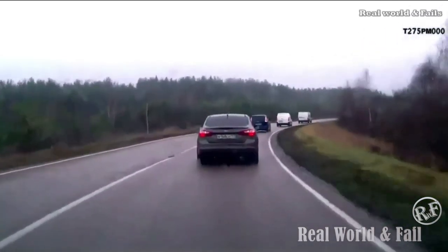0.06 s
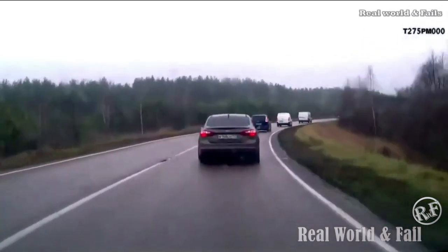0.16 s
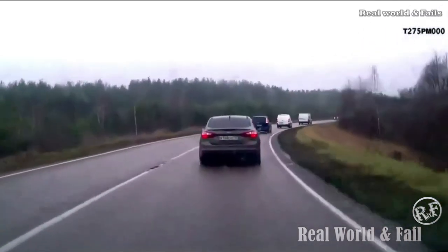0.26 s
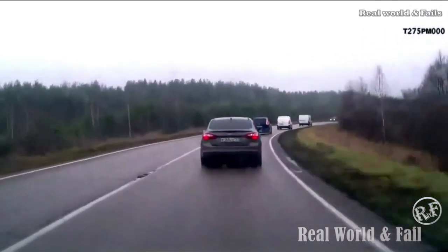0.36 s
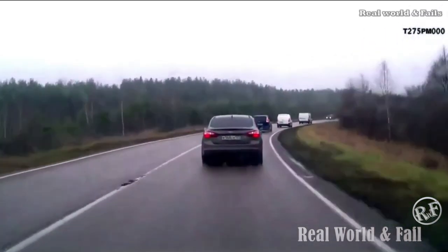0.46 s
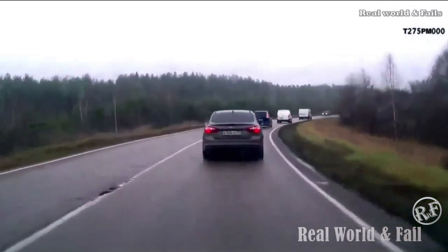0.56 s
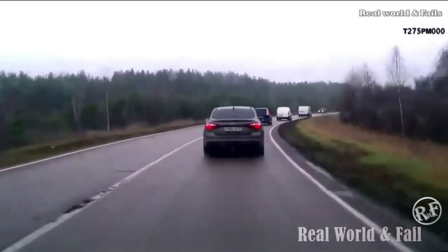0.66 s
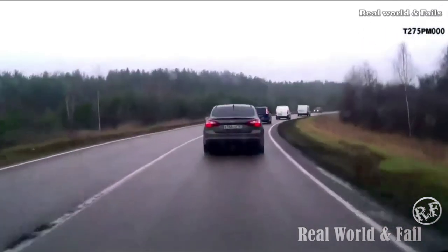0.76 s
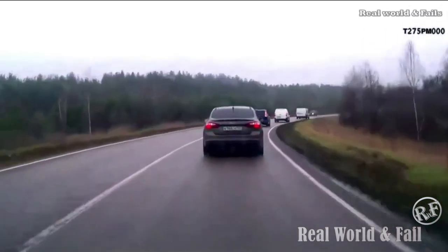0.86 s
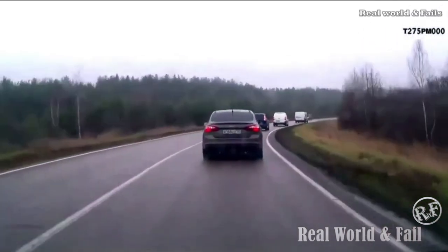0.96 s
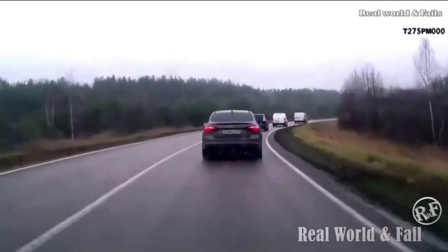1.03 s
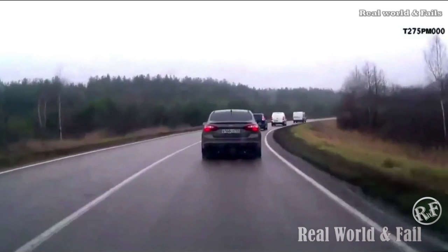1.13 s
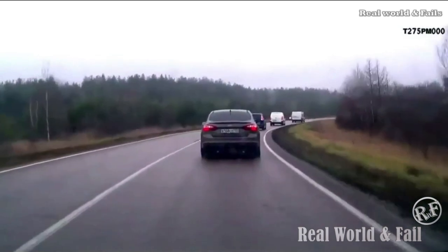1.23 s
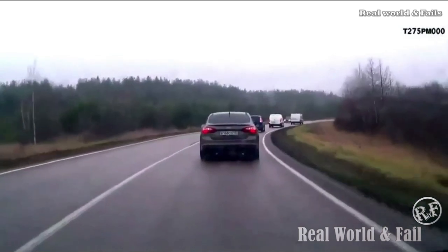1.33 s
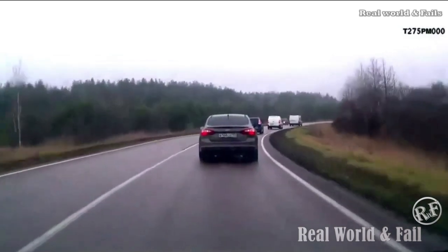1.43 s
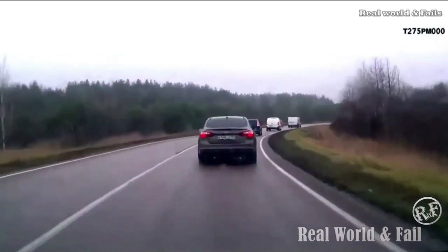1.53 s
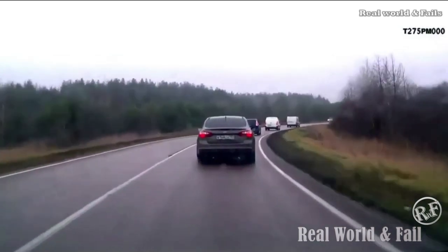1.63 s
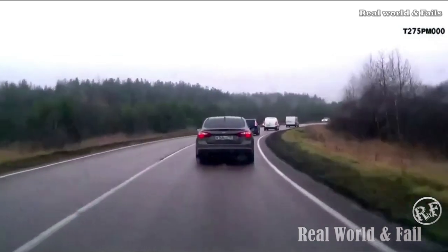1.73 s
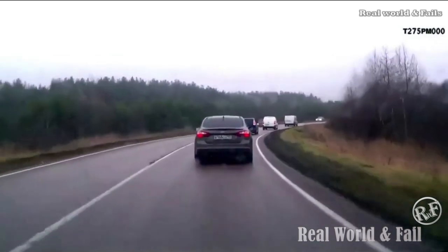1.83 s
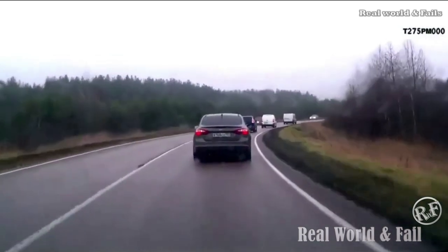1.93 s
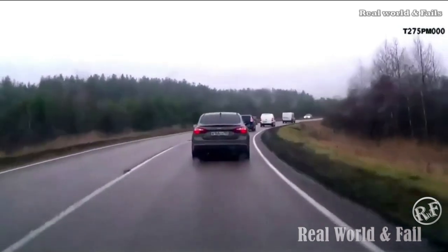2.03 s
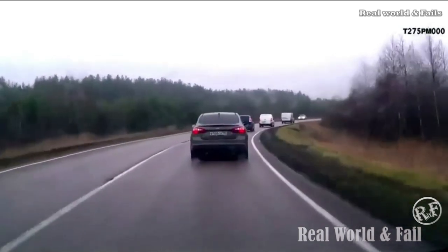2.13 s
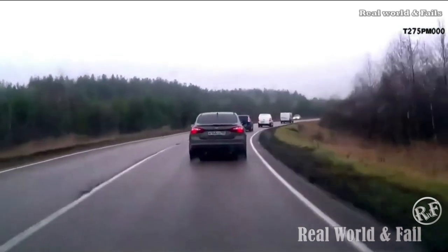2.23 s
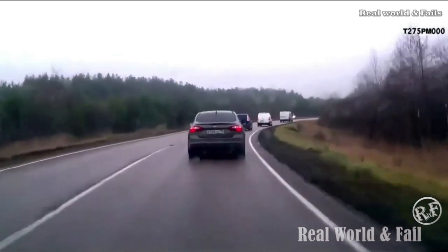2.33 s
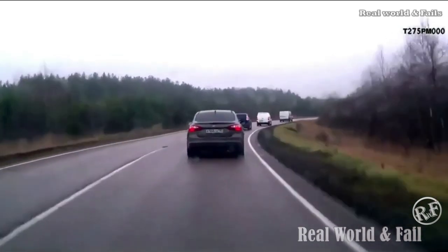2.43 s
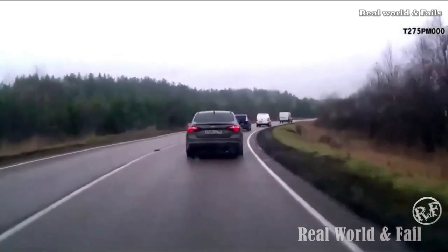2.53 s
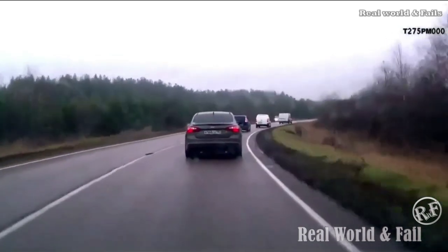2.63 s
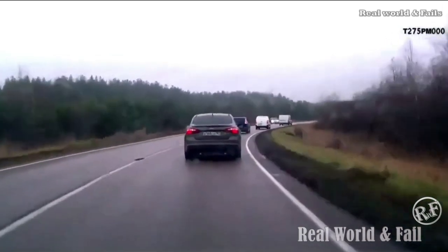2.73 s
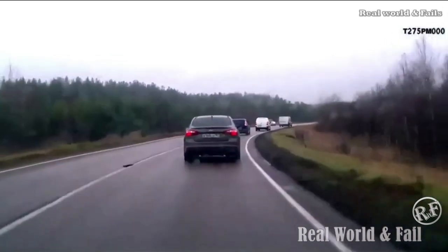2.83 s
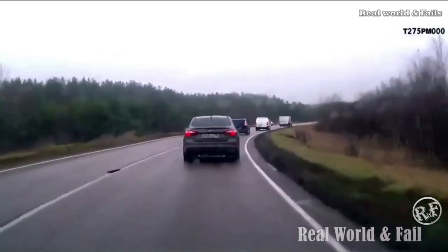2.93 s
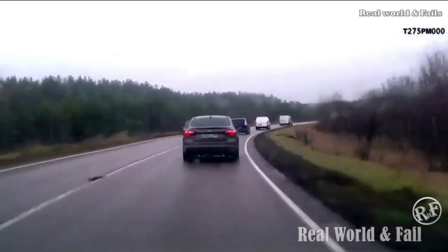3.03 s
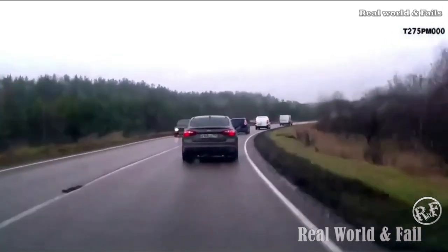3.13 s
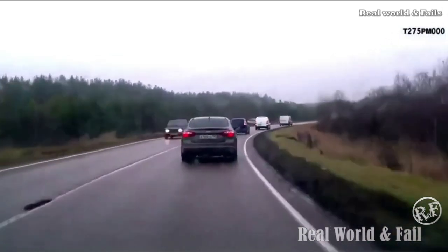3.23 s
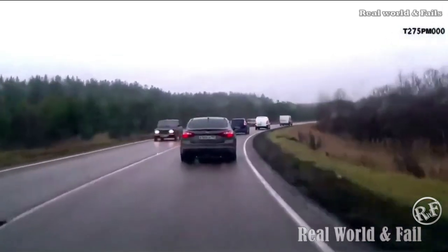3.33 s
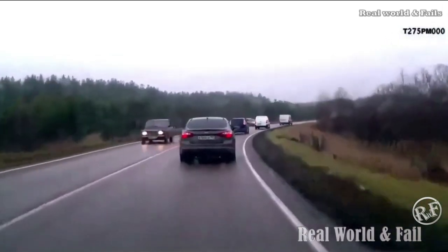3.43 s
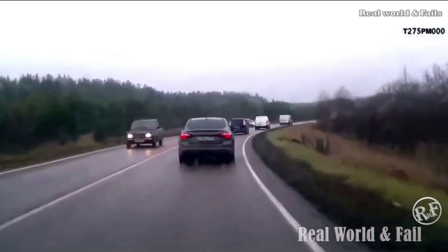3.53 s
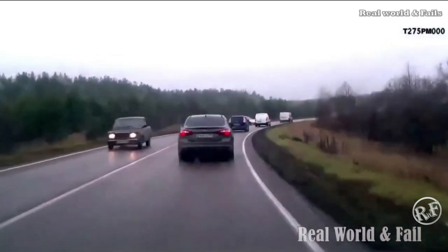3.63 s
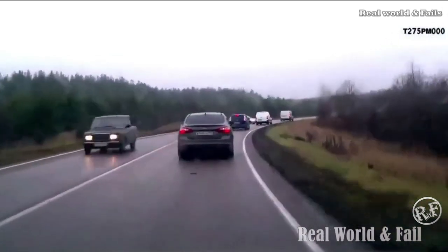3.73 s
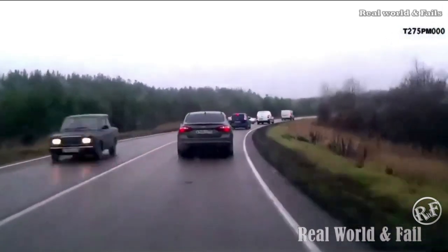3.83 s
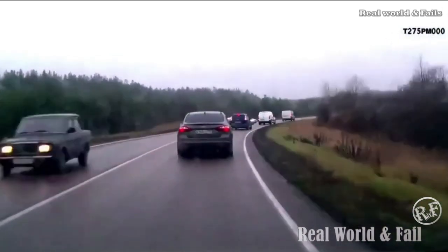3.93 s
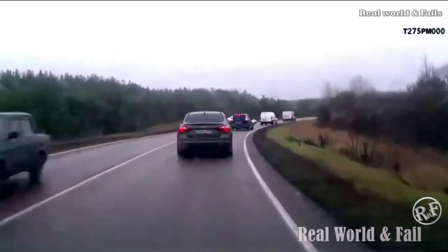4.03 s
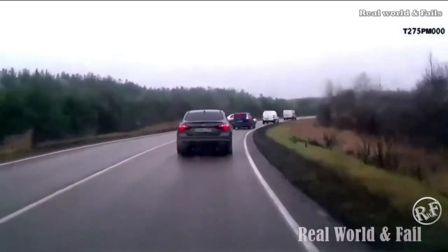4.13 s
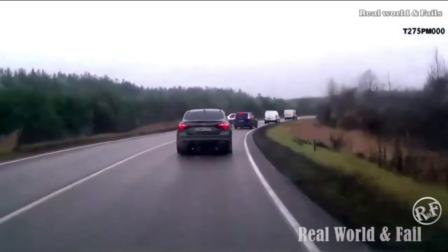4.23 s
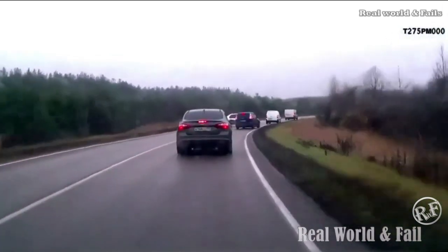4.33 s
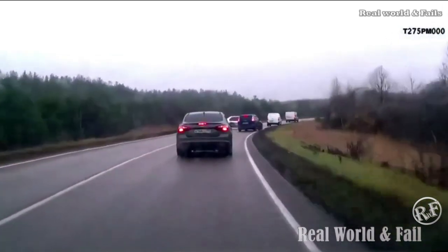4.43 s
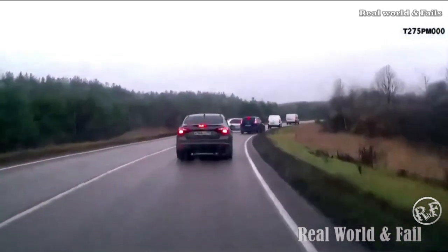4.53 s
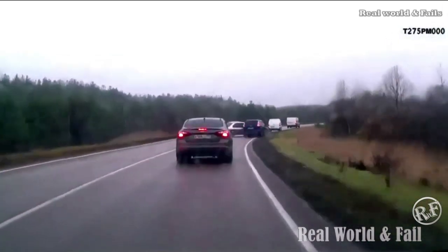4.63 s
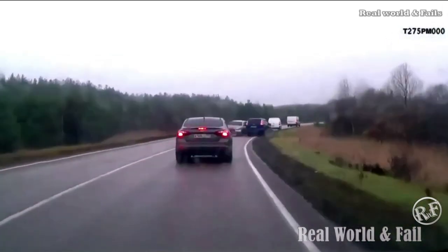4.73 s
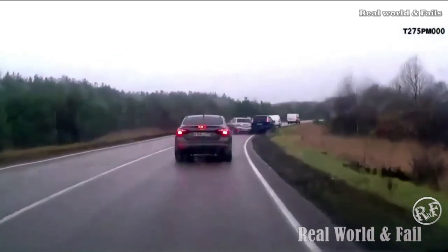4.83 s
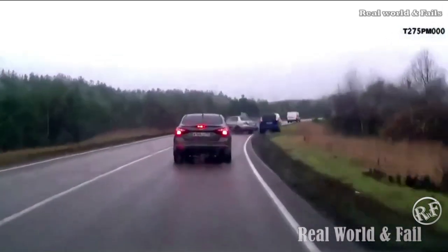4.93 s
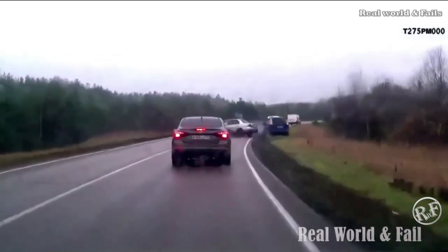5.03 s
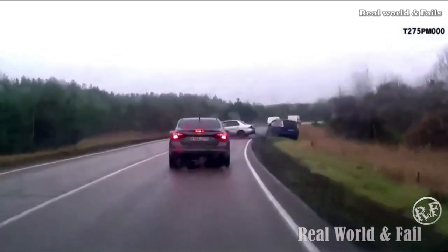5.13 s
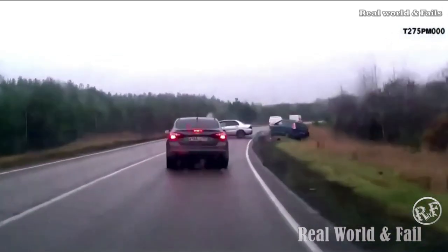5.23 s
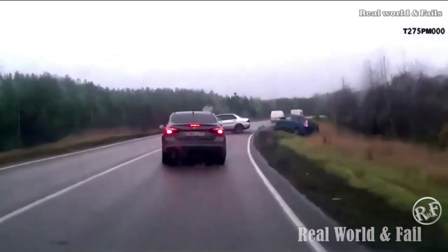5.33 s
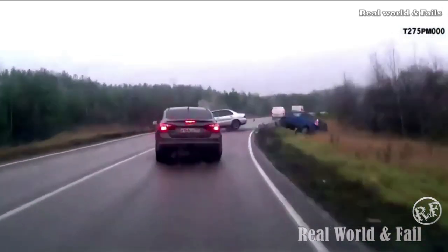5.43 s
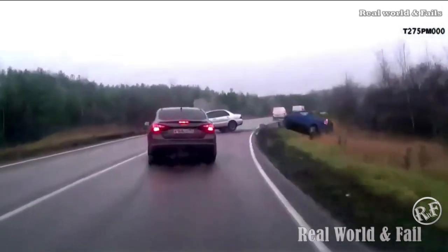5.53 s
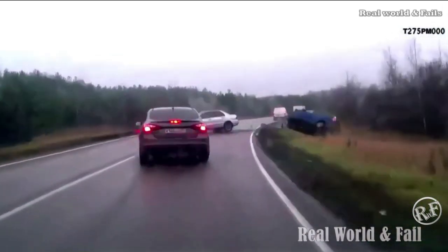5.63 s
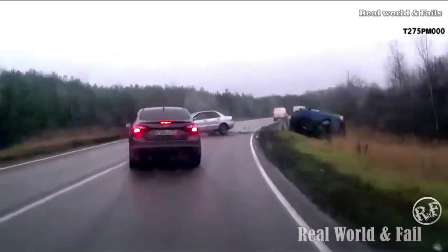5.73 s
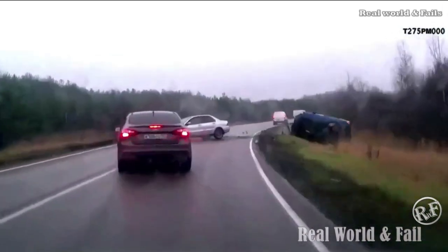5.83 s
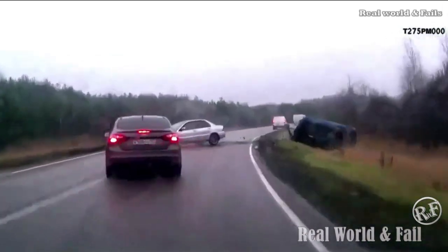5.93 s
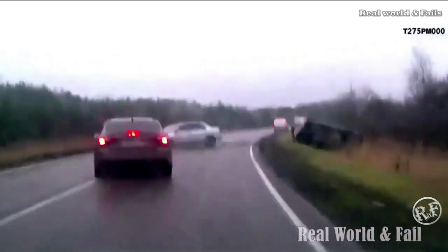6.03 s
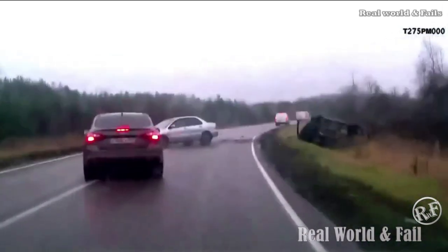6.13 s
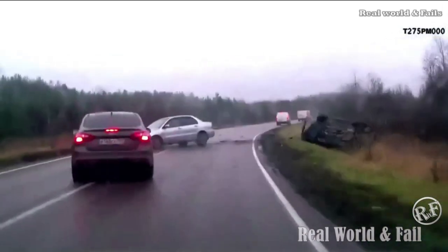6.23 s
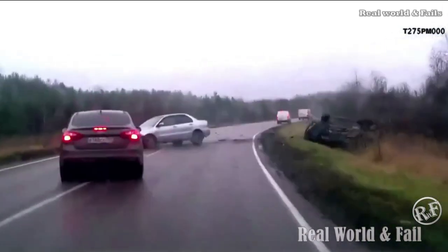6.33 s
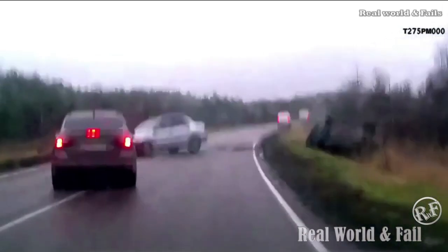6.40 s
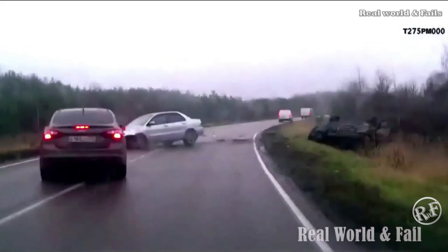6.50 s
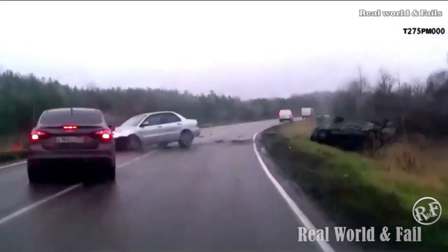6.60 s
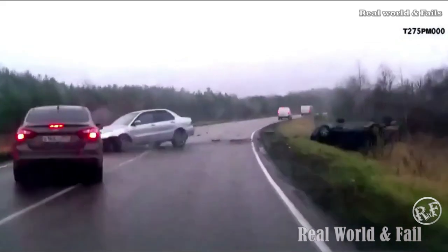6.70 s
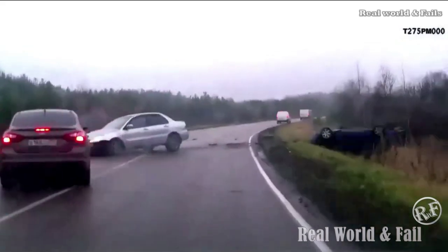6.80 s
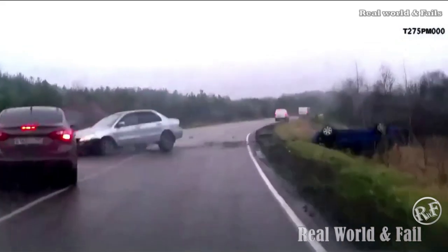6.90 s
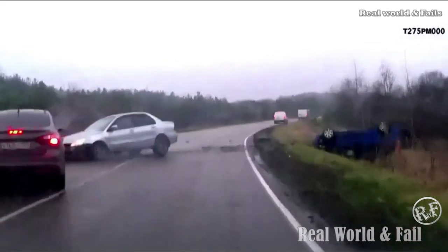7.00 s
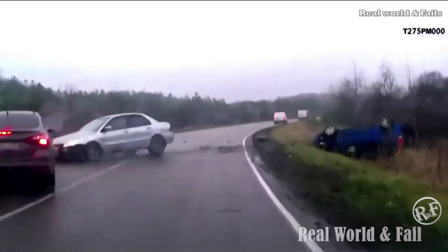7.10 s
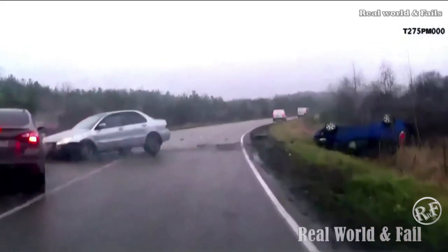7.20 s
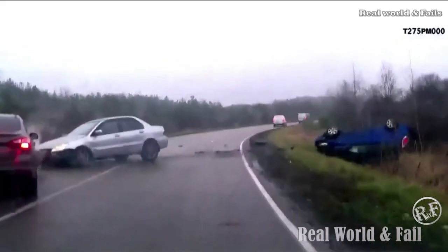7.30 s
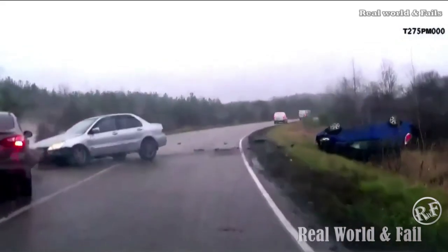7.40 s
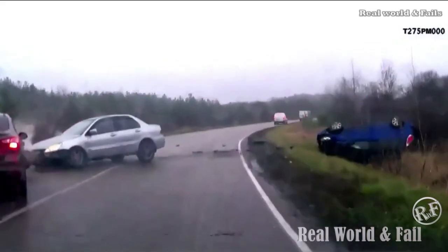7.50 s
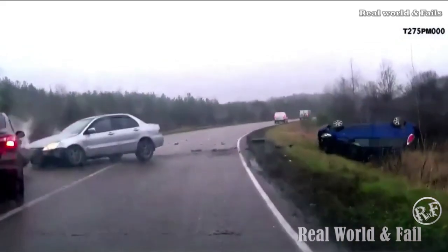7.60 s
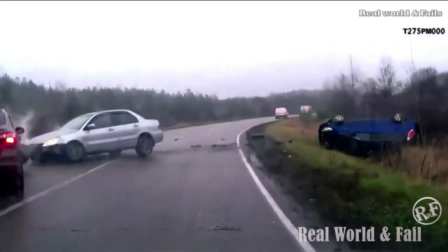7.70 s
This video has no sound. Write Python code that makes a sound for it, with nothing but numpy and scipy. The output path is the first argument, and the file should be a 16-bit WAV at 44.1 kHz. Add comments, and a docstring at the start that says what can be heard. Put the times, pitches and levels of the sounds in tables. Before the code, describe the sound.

Boomy cabin drone with a brief motor whine, suddenly broken by crunching car impacts, spraying glass and clanking wreckage before the noise sinks.

```python
"""Inside a car on a wet road: tyre and engine drone booms in the cabin, a small motor whines, the trim ticks.
Then cars collide ahead: sheet metal crumples, glass and debris scatter, a body thuds and rolls, parts bang down.
The cabin is resonant noise and wandering tones; the crash is noisy contacts ringing banks of resonances.
The loudest blows overload; at the end the sound sinks."""
import sys
import numpy as np
from scipy import signal
from scipy.io import wavfile

SR = 44100
rng = np.random.default_rng(int(sys.argv[2]) if len(sys.argv) > 2 else 0)


def pcm_store(signal):
    """Save signal as 16-bit PCM."""
    levels = np.round(np.clip(np.atleast_2d(signal), -1, 1) * 32767)
    wavfile.write(sys.argv[1], SR, levels.astype(np.int16).T)


N = 342216


def from_db(db):
    """Decibels to gain."""
    return 10 ** (np.asarray(db) / 20)


def rms_one(x):
    """Scale to unit rms."""
    return x / np.sqrt(np.mean(x ** 2) + 1e-20)


def in_time(rows):
    """Value columns of a breakpoint curve, interpolated sample by sample."""
    s, *columns = np.transpose(rows)
    return [np.interp(np.arange(N) / SR, s, column) for column in columns]


def at_hz(points, hz):
    """Read a spectrum on a log-frequency axis."""
    points = np.array(points, float)
    return np.interp(np.log(hz), np.log(points[:, 0]), points[:, 1])


def sides(pan_db):
    """Left and right gains for a left-minus-right level difference."""
    return from_db(np.array([[.5], [-.5]]) * pan_db)


def drift(rate_hz):
    """Slow chance of rms 1: noise through two equal low-passes, computed every 40 samples."""
    step = 40
    r = np.exp(-2 * np.pi * rate_hz * step / SR)
    noise = rng.standard_normal(N // step + 2002)
    slow = signal.lfilter([1], [1, -2 * r, r * r], noise)[2000:]  # settled part only
    return np.interp(np.arange(N) / step, np.arange(len(slow)), rms_one(slow))


def steep(x, stop_hz, kind):
    """Sharp low- or high-pass, 50 dB down at the stop edge."""
    return signal.sosfilt(signal.cheby2(10, 50, stop_hz, kind, fs=SR, output="sos"), x)


def resonate(x, hz, width_hz):
    """One resonance; white noise of rms 1 leaves it with rms 1."""
    r = np.exp(-np.pi * width_hz / SR)
    gain = np.sqrt((1 - r * r) / 2)
    return signal.lfilter([gain, 0, -gain], [1, -2 * r * np.cos(2 * np.pi * hz / SR), r * r], x)


def resonate_twice(x, hz, width_hz):
    """Two resonances in series for steep flanks; the second is twice as wide."""
    once = resonate(x, hz, width_hz)
    return resonate(once, hz, 2 * width_hz) * np.sqrt(3 * np.pi * width_hz / SR)


def modes(x, table, patchy_db=0.):
    """Parallel resonances of summed power 1; random signs push or pull each, its level drifting by patchy_db."""
    total = np.sqrt(sum(from_db(db) ** 2 for hz, width_hz, db in table))
    signs = rng.choice([-1, 1], N)
    out = 0
    for k, (hz, width_hz, db) in enumerate(table):
        drive = x * np.roll(signs, 97 * k)  # the shift makes the modes unrelated
        out = out + resonate_twice(drive * from_db(db + patchy_db * drift(10)), hz, width_hz)
    return out / total


# Stereo image. Each row: frequency in Hz, left-right correlation.
LIKENESS = [(60, 1), (130, 0.75), (290, 0.92), (640, 0.32), (1410, -0.37), (3100, 0.066), (6820, -0.4),
            (15000, -0.25)]
# Each row: frequency in Hz, left minus right in dB.
BALANCE_DB = [(60, 1), (110, -2.5), (200, 0), (380, 0.5), (700, 2), (1290, -1), (2380, 2), (4400, -2.5),
              (8120, 1.5), (15000, 2)]


def stereo(mid, side, hz):
    """Two unrelated signals mixed to the likeness and balance at that frequency."""
    alike = np.clip(at_hz(LIKENESS, hz), -.99, .99)
    pair = np.sqrt(1 + alike) * mid + np.sqrt(1 - alike) * side * [[1], [-1]]
    return sides(at_hz(BALANCE_DB, hz)) * pair / np.sqrt(2)


def fading(s, peak_db, fade_s):
    """Envelope of hits: each jumps up and falls 60 dB in its fade time."""
    out = np.zeros(N)
    starts = (np.array(s) * SR).astype(int)
    for at, peak, fade in zip(starts, from_db(peak_db), np.clip(fade_s, .002, .5)):
        t = np.arange(min(int(fade * SR), N - at)) / SR
        out[at:at + len(t)] += peak * from_db(-60 * t / fade)
    return out


def swells(s, length_s, first_db, last_db, rise_db_per_s, end_db_per_s):
    """Envelope of events that rise, run from one level to another and die away; the loudest rules."""
    t, out_db = np.arange(N) / SR, np.full(N, -120.)
    for at, span, first, last, dying in np.broadcast(s, length_s, first_db, last_db, end_db_per_s):
        level_db = np.interp(t, [at, at + span], [first, last])
        level_db -= rise_db_per_s * np.maximum(at - t, 0) + dying * np.maximum(t - at - span, 0)
        out_db = np.maximum(out_db, level_db)
    return from_db(out_db)


# Faint treble hiss. Each row: time in seconds, level in dB.
SPRAY = [(0, -75.5), (.8, -78), (1.3, -70), (1.9, -80), (2.4, -90), (7.76, -95)]
SPRAY_HZ, SPRAY_WIDTH_HZ = 4500, 3700


def spray():
    """Wide, faint treble hiss: noise through one broad resonance, nearly gone after the first seconds."""
    mid, side = resonate_twice(rng.standard_normal((2, N)), SPRAY_HZ, SPRAY_WIDTH_HZ)
    return from_db(*in_time(SPRAY)) * rms_one(stereo(mid, side, SPRAY_HZ))


# Road noise level. Each row: time in seconds, level in dB.
ROAR = [(0, -37.5), (1.2, -37.5), (2.4, -38), (3.6, -37.5), (4.7, -37.5), (6, -36.5), (7, -35.5),
        (7.4, -38.5), (7.76, -42)]
# Road noise spectrum. Each row: frequency in Hz, relative density in dB per Hz.
ROAD = [(140, -7.5), (210, -10.5), (300, -15), (420, -18), (600, -24.5), (840, -28), (1300, -32.5),
        (1750, -39.5), (2150, -48), (3100, -51), (4600, -61.5), (6300, -57), (9500, -79.5), (13000, -59)]
# Wavering cabin tones and tread bands. Each row: frequency in Hz, width in Hz, level in dB at the start.
HUM = [(346.5, 4.2, -51), (450.3, 4.4, -53.5), (574, 2.4, -57), (270, 20, -57.5), (1640, 120, -65),
       (2950, 340, -75.5)]


def road():
    """Tyre roar and spray: noise in 0.4-octave bands of drifting level, topped by narrow wavering tones."""
    road_db, = in_time(ROAR)
    out, together, edges_hz = 0, drift(1.5), 125 * 2 ** np.arange(0, 7.3, .4)
    white = rng.standard_normal((2, 2, N))
    for k, (low, high) in enumerate(zip(edges_hz, edges_hz[1:])):
        band = signal.butter(2, [low, high], "band", fs=SR, output="sos")
        mid, side = signal.sosfilt(band, white[k % 2])  # neighbours get different noise
        hz = np.sqrt(low * high)
        level_db = at_hz(ROAD, hz) + .6 * together + .8 * drift(9)
        out = out + from_db(level_db) * stereo(mid, side, hz)
    out = from_db(road_db) * rms_one(out)
    for hz, width_hz, db in HUM:
        mid, side = resonate(rng.standard_normal((2, N)), hz, width_hz)
        out += from_db(db + road_db - road_db[0]) * stereo(mid, side, hz)
    return out


# Cabin and tyre modes in four groups: deep boom, tyre boom, lower hum, upper hum.
# Each row of a group: frequency in Hz, width in Hz, relative level in dB.
BOOM = [
    [(25, 9.7, -5), (33, 23, -5), (48.5, 25, 6)],
    [(73, 7.6, -7.5), (99.9, 18, -1), (117.9, 12, -7)],
    [(180.3, 8.6, 0)],
    [(213.2, 11.3, 0)],
]
# Chance swelling, one value per group, in dB.
BOOM_SWELL_DB = [3.6, 1.5, 1.5, 3.9]
BOOM_SWELLS_PER_S = 2.07
DEEP_BOOM_DB, UPPER_HUM_DB = -6.5, -15  # against the tyre boom


def boom(boom_db, hum_db):
    """Road bumps, as noise, shake the low cabin and tyre modes; each group swells by chance."""
    out, levels_db = 0, [boom_db + DEEP_BOOM_DB, boom_db, hum_db, boom_db + UPPER_HUM_DB]
    for level_db, swell_db, group in zip(levels_db, BOOM_SWELL_DB, BOOM):
        sound = 0
        for hz, width_hz, db in group:
            mid, side = resonate_twice(rng.standard_normal((2, N)), hz, width_hz)
            sound = sound + from_db(db) * rms_one(stereo(mid, side, hz))
        out = out + from_db(level_db + swell_db * drift(BOOM_SWELLS_PER_S)) * rms_one(sound)
    return out


def throb(hz, level_db):
    """The deepest cabin tone: a sine that wanders in pitch and strength."""
    turn = 2 * np.pi * np.cumsum(hz * (1 + 0.075 * drift(2.93))) / SR
    return np.sqrt(2) * from_db(level_db + 2.9 * drift(6.7)) * np.sin(turn) * sides(-.4)


# Drone over a changing road surface. Each row: time in seconds, mean throb pitch in Hz, then mean levels
# in dB of throb, tyre boom and lower hum.
DRONE = [(0, 42.9, -34, -31, -43), (.5, 41.95, -38.5, -32.5, -35.5), (.9, 45.7, -31.5, -32, -36),
         (1.25, 46.2, -41.5, -31.5, -43), (1.7, 45.84, -31.5, -31, -41), (2.05, 33.55, -41, -33.5, -36.5),
         (2.5, 36.9, -38.5, -33, -48), (2.9, 33, -29.5, -30.5, -35.5), (3.2, 40.75, -33.5, -33, -43),
         (3.45, 37.5, -48, -30, -41.5), (3.7, 38.2, -41, -31, -41), (4, 43.84, -35, -31.5, -49),
         (4.4, 35.28, -30, -31.5, -38.5), (5, 33.18, -49, -34, -50.5), (5.45, 34.07, -32, -32, -35.5),
         (5.65, 35, -25, -26.5, -47), (5.85, 34.5, -32.5, -33.5, -38.5), (6.3, 30.4, -31, -32, -42),
         (6.75, 37.1, -44, -30, -45.5), (6.96, 37.33, -22.5, -33.5, -43), (7.15, 37, -47, -33, -39.5),
         (7.76, 38.3, -39, -46, -39)]


def drone():
    """Throb and boom follow the changing road surface."""
    throb_hz, throb_db, boom_db, hum_db = in_time(DRONE)
    return throb(throb_hz, throb_db) + boom(boom_db, hum_db)


# Low tones sliding upward. Each row: start in seconds, length in seconds, first and last Hz, mid-slide rms in dB.
SLIDES = [(1.053, 0.466, 195.8, 238.8, -42), (2.75, 0.714, 202, 229.4, -41.5)]


def slides():
    """Unsteady sines that swell, climb and fade."""
    out, t, waver_db = 0, np.arange(N) / SR, 4.3 * drift(5.7)
    for s, length_s, first_hz, last_hz, db in SLIDES:
        along = np.clip((t - s) / length_s, 0, 1)
        turn = 2 * np.pi * np.cumsum(first_hz + (last_hz - first_hz) * along) / SR
        swell = np.sqrt(2 * np.sin(np.pi * along).clip(0))
        out = out + swell * from_db(db + waver_db) * np.sin(turn)
    return out


# Motor whine. Each row: time in seconds, pitch in Hz, mean level in dB, half-pitch tone level in dB.
WHINE = [(0, 568, -48, -80), (.3, 587, -54, -84), (.55, 528, -57, -77), (.75, 496.5, -72, -79),
         (.82, 451, -55, -73), (.96, 547.5, -50, -67), (1.15, 612.3, -51.5, -47), (1.42, 621, -55, -40.5),
         (1.52, 604, -51, -71), (1.7, 585, -75, -83), (1.9, 558, -91, -86)]


def whine():
    """A small motor under changing load: one tone and its half."""
    hz, level_db, half_db = in_time(WHINE)
    turn = 2 * np.pi * np.cumsum(hz) / SR
    tone = from_db(level_db + 2.5 * drift(8)) * np.sin(turn)
    half = from_db(half_db) * np.sin(turn / 2)
    return np.sqrt(2) * (tone + half) * sides(-2.5)


# Trim ticks. Each row: start in seconds, burst peak before the band-pass in dB, left minus right in dB,
# lowest Hz, fade in seconds.
TICKS = [(0.0517, -39.5, 5, 2410, 0.04), (0.8181, -60, 4, 2650, 0.03), (1.0038, -59, 11.5, 2550, 0.03),
         (1.1502, -56, 0.0, 2500, 0.029), (1.1743, -49, -3, 2440, 0.038), (1.2346, -54, -1.0, 2500, 0.03),
         (1.3462, -60, 26, 2450, 0.038), (1.41, -54, 5, 2496, 0.033), (1.4753, -52, 7, 2510, 0.098)]


def ticks():
    """Short bright bursts from the trim: fading noise, band-passed up to 6 kHz."""
    out = np.zeros((2, N))
    noise = rng.standard_normal(N)
    for s, peak_db, pan_db, low_hz, fade_s in TICKS:
        part = slice(int(s * SR), int(s * SR) + SR // 10)
        burst = (noise * fading([s], [peak_db], [fade_s]))[part]
        band = signal.butter(2, [low_hz, 6000], "band", fs=SR, output="sos")
        out[:, part] += signal.sosfilt(band, burst) * sides(pan_db)
    return out


# A stone hits the right side. One row: gain in dB, left minus right in dB, fall rate in Hz, rise rate in Hz.
STONE = (-16.5, -32, 199, 4000)
STONE_S = 3.1009


def stone():
    """One broad knock: a quick push that sinks back, the difference of two exponentials."""
    gain_db, pan_db, fall_hz, rise_hz = STONE
    t = np.maximum(np.arange(N) / SR - STONE_S, 0)
    push = np.exp(-2 * np.pi * fall_hz * t) - np.exp(-2 * np.pi * rise_hz * t)
    return from_db(gain_db) * push * from_db([[pan_db], [0]])


def grains(per_s, spread_db):
    """Uneven contacts of breaking parts on a bed of noise; rms 1."""
    sizes = from_db(spread_db * np.minimum(rng.exponential(1, N), 5)) * rng.choice([-1, 1], N)
    contacts = rms_one(sizes * (rng.random(N) < per_s / SR))
    return rms_one(contacts + 1.23 * rng.standard_normal(N))


# The wreck grinds on under the blows. Each row: time in seconds, crumpling, scraping and rumble drive in dB.
GRIND = [(4.695, -32, -37.5, -27), (4.87, -33, -39, -37), (4.94, -32, -39, -36), (5.15, -31, -38, -34),
         (5.19, -37.5, -42.5, -36), (5.39, -40, -45.5, -46), (5.58, -45, -44, -33),
         (5.8, -46.5, -50.5, -45), (6.05, -42, -59, -31.5), (6.11, -35, -47, -35.5),
         (6.3, -38, -44.5, -39.5), (6.55, -33, -44.5, -40), (6.7, -37.5, -43.5, -39),
         (6.9, -35.5, -44.5, -46), (7.08, -37.5, -42, -37.5), (7.22, -41.5, -44, -38),
         (7.42, -46.5, -49, -40.5), (7.57, -44, -51.5, -62), (7.7, -55.5, -61, -50), (7.76, -49, -60, -53)]
# Metal folds for a while. Each row: start in seconds, hold in seconds, shell, panel and thud drive in dB,
# dying rate in dB per second.
CRUNCHES = [(4.713, 0.032, -24.5, -34, -25, 180), (4.787, 0.019, -22.5, -31.5, -26.5, 245),
            (4.944, .02, -17.5, -27.5, -24, 500), (4.981, .045, -15, -18, -20, 280),
            (5.088, .01, -27.5, -32.5, -29.5, 150), (5.609, .03, -26, -36.5, -20.5, 101),
            (5.642, .05, -40, -39.5, -19, 250), (5.765, .02, -36.5, -41, -35, 700),
            (6.077, .015, -29.5, -36.5, -37, 297), (6.506, .012, -26, -43.5, -40, 451),
            (6.93, .01, -27, -38, -34.5, 88), (7.143, 0.023, -33.5, -40.5, -33, 350),
            (7.273, 0.027, -33.5, -44, -41, 96)]
CRUNCH_RISE_DB_PER_S = 899
# Showers of glass. Each row: start in seconds, length in seconds, first and last drive in dB.
SHOWERS = [(4.76, 0.13, -50.5, -57), (4.952, .028, -37, -28), (4.982, 0.044, -22, -14),
           (5.04, 0.14, -21, -45.5), (5.17, 0.16, -45, -44), (5.6, .19, -45, -47.5), (5.79, .1, -54, -51),
           (5.9, 0.16, -62, -65), (6.1, 0.054, -53, -57), (6.17, 0.37, -51.5, -51.5),
           (6.53, .39, -53, -55.5), (6.93, 0.17, -46, -62), (7.11, 0.072, -48, -57), (7.22, 0.18, -55, -60),
           (7.44, 0.27, -61, -75)]
# Showers of fine splinters. Each row: start in seconds, length in seconds, first and last drive in dB.
SPLINTERS = [(4.96, .022, -73, -62), (4.991, 0.031, -46, -37.5), (5.904, .74, -79, -81),
             (6.663, 0.25, -68, -65.5), (6.925, .3, -63.5, -64), (7.23, 0.34, -66, -77)]
SHOWER_RISE_DB_PER_S, SHOWER_END_DB_PER_S = 1500.5, 802


def grinding():
    """Strength of the sustained drive into shell, panels, ground, glass and splinters."""
    start = np.arange(N) > GRIND[0][0] * SR
    s, hold_s, *parts_db, dying = np.transpose(CRUNCHES)
    drives = []
    for bed_db, db in zip(in_time(GRIND), parts_db):
        crunch = swells(s, hold_s, db, db, CRUNCH_RISE_DB_PER_S, dying)
        drives.append(start * np.maximum(from_db(bed_db), crunch))
    for rows in (SHOWERS, SPLINTERS):
        drives.append(swells(*np.transpose(rows), SHOWER_RISE_DB_PER_S, SHOWER_END_DB_PER_S))
    return drives


def blows(contacts, s, level_db, fade_s, snap_db):
    """Each blow opens with one hard contact, then rattles out."""
    out = contacts * fading(s, level_db, fade_s)
    out[(s * SR).astype(int)] += from_db(level_db + snap_db)
    return out


# Struck parts ring. Each row: start in seconds, rattle peak in dB, pitch in Hz, width in Hz, rattle fade in seconds.
CLANGS = [(4.711, -28.5, 2990, 405, 0.44), (4.718, -24, 910, 150, 0.47), (4.76, -28, 2530, 300, 0.13),
          (4.945, -21.5, 1500, 425, 0.078), (4.99, -24, 2700, 300, 0.12), (5.16, -48, 604, 204, .08),
          (5.249, -27, 496, 399, 0.062), (5.401, -33, 905, 500, 0.012), (5.557, -25, 2474, 400, 0.036),
          (5.599, -16, 88.6, 80, 0.36), (5.61, -38, 950, 202, .1), (5.625, -16, 270, 150, 0.1),
          (5.664, -16, 198.6, 148, 0.21), (6.084, -19.5, 663, 150, 0.086), (6.086, -23, 2460, 300, 0.032),
          (6.235, -39.5, 3230, 300.5, 0.44), (6.273, -34, 2670, 298, 0.13), (6.505, -23, 1256, 500, 0.14),
          (6.51, -43, 1800, 398, 0.076), (6.56, -30, 1184, 150, 0.31), (6.83, -31, 670, 150.5, 0.13),
          (6.928, -20.5, 710, 149, 0.13), (6.934, -25, 1660, 400, 0.096), (6.975, -34, 2000, 511, 0.43),
          (7.114, -32, 1870, 514, 0.18), (7.145, -33, 1970, 890, 0.17), (7.148, -47, 895, 400, 0.048),
          (7.29, -21, 830, 202, 0.042), (7.46, -37, 796, 206.6, 0.12), (7.559, -37, 840, 149.4, 0.052)]


def clangs(metal):
    """A dying rattle through one steep resonance for each struck part."""
    out = np.zeros(N)
    for s, peak_db, hz, width_hz, fade_s in CLANGS:
        part = slice(int(s * SR), int(s * SR) + SR // 2)
        burst = (metal * fading([s], [peak_db], [fade_s]))[part]
        out[part] += resonate_twice(burst, hz, width_hz)
    return out


# Blows. Each row: start in seconds, clank drive in dB, then body, glass, splinter and thud drive in dB above
# the clank, base fade in seconds, scaled for each layer.
BLOWS = [(4.699, -35, 13, -49, -63, 7, 0.1), (4.9457, -35, 11, -26, -60, -2, 0.13),
         (4.983, -16.5, -8, -7, -28, -23, 0.18), (5.082, -27, -12, -18, -63, -29, 0.18),
         (5.159, -27.5, 11.5, -16, -50, 8.5, 0.064), (5.248, -40, 17, -3, -48, 22, 0.051),
         (5.3994, -37.5, 18.5, -31, -46, 17, 0.063), (5.5526, -14, -5.5, -37, -33.5, -29, 0.073),
         (5.607, -33, 5, -9, -57, 8, 0.06), (5.6263, -25, -16, -14, -57, -7, 0.081),
         (5.649, -27, -15, 0, -60, -8, 0.034), (5.683, -35, -1, 0, -49, 13, 0.026),
         (5.732, -23, 0, -6, -48, -7, 0.04), (5.7831, -37.5, -8, 4.5, -49, -7, 0.021),
         (5.8385, -43, 3, -12, -44, 12, 0.18), (6.0051, -49, 0, -9, -32, 14, 0.06),
         (6.0843, -24.5, 6, -44, -59, 8, 0.023), (6.246, -43, -7, -4, -46, -29, 0.1),
         (6.3444, -32, 11, 3, -9.5, -2, 0.021), (6.454, -35, -16, -16, -42, -8, 0.088),
         (6.499, -35.5, 11, -10, -52, -15, 0.066), (6.7245, -36.5, -14, -2, -39, -10, 0.04),
         (6.8341, -34, -5, -13, -33, -14, 0.082), (6.9264, -38, 13, -6, -26, 18, 0.071),
         (6.9717, -33, -13, -11, -14, -14, 0.044), (7.1097, -44, 3, -15, -12, -12, 0.14),
         (7.144, -33.5, 4, -2, -13, -9, 0.091), (7.215, -40.5, 12.5, -3, -23, -13, 0.039),
         (7.255, -43, -4, -6, -17, -5, 0.12), (7.2895, -57, -4, -27, -30, -10, 0.1),
         (7.446, -48, 4, -17, -18, -10, 0.063)]
# Shell modes. Each row: frequency in Hz, width in Hz, relative level in dB.
BODY = [(486, 100, -2), (621, 220, 9), (819, 130, 7), (915, 110, 8.5), (1120, 200, 4), (1320, 290, -4.5)]
# Panel modes. Each row: frequency in Hz, width in Hz, relative level in dB.
PANEL = [(1540, 580, -1), (2340, 400, -5), (2670, 760, 1.5), (2920, 340, -15.5), (3330, 1100, -3),
         (4100, 390, -6.5)]
# Glass modes. Each row: frequency in Hz, width in Hz, relative level in dB.
GLASS = [(4460, 1100, 2.5), (4886, 950, 0.5), (5600, 510, -0.5), (6230, 270, -2), (7210, 410, 11.5)]
# Thud modes. Each row: frequency in Hz, width in Hz, relative level in dB.
THUD = [(34.3, 22, -4), (70, 69, 1.5), (129, 34.4, -6), (205, 194, 3.5), (292, 130, -3.5),
        (409, 280, -13.5)]
PATCHY_DB = 2.5
GLASS_TOP_HZ, PANEL_TOP_HZ = 7820, 4650
OVERLOAD = .33  # amplitude ceiling


def crash():
    """Grinding and blows drive shell, panels, glass and ground, whose sum overloads; splinters stay clean."""
    crumple, scrape, rumble, glass, splinter = grinding()
    s, clank_db, body_db, glass_db, splinter_db, thud_db, fade_s = np.transpose(BLOWS)
    surge = from_db(2 * drift(20))
    metal = grains(per_s=1200.0, spread_db=2.0)
    shards = grains(per_s=5000.0, spread_db=-3.0)
    ground = rng.standard_normal(N)

    shell_hits = blows(metal, s, clank_db + body_db, fade_s, snap_db=13)
    shell = modes(metal * surge * crumple + shell_hits, BODY, PATCHY_DB)
    panel_hits = blows(metal, s, clank_db, 0.39 * fade_s, snap_db=8)
    clank = modes(metal * surge * scrape + panel_hits, PANEL, PATCHY_DB)
    ground_hits = blows(ground, s, clank_db + thud_db, 1.7 * fade_s, snap_db=18.5)
    thump = modes(ground * rumble + ground_hits, THUD)
    glass_hits = blows(shards, s, clank_db + glass_db, 1.3 * fade_s, snap_db=8.5)
    tinkle = modes(shards * surge * glass + glass_hits, GLASS, PATCHY_DB)

    out = steep(shell + clank + clangs(metal) + thump, PANEL_TOP_HZ, "low") + steep(tinkle, 2690, "high")
    out = out / (1 + (out / OVERLOAD) ** 4) ** .25  # soft clipping

    fine_hits = blows(shards, s, clank_db + splinter_db, 0.36 * fade_s, snap_db=15)
    fine = steep(shards * splinter + fine_hits, 4670, "high")
    return steep(out, GLASS_TOP_HZ, "low") + resonate(fine, 9400, 7000)


def scene():
    """Wide cabin sound, with the crash in the middle."""
    cabin = spray() + road() + drone() + slides() + whine() + ticks() + stone()
    return cabin + crash()


CUTOFF_HZ = 16150


def record(dry):
    """The top is cut: 70 dB down from the cutoff up."""
    return signal.sosfilt(signal.cheby2(20, 70, CUTOFF_HZ, fs=SR, output="sos"), dry)


dry = scene()
out = record(dry)
pcm_store(out)
```